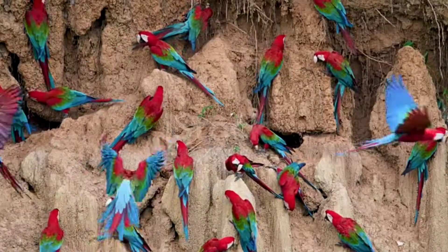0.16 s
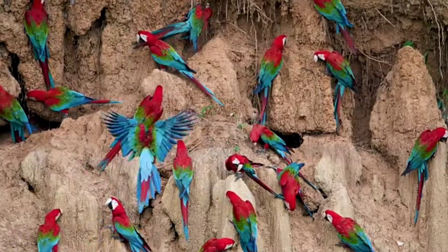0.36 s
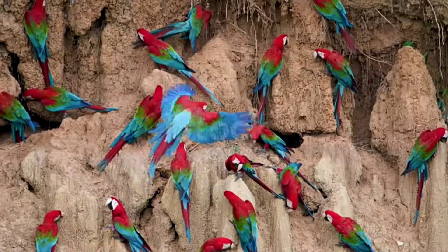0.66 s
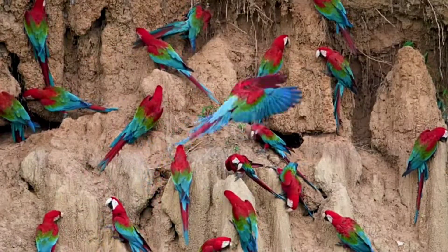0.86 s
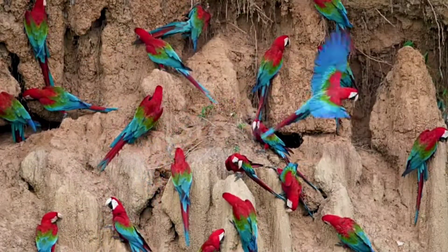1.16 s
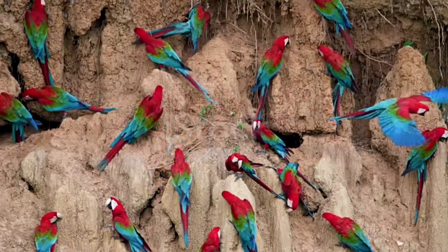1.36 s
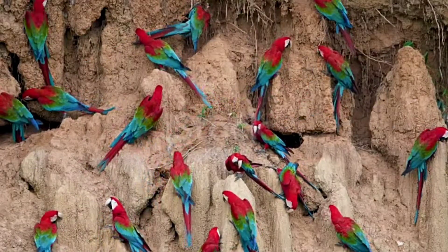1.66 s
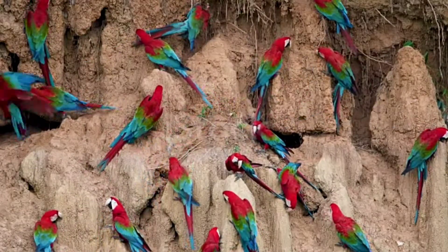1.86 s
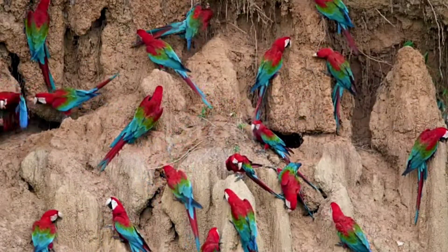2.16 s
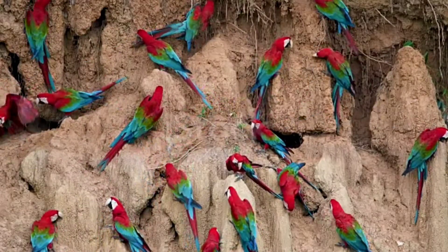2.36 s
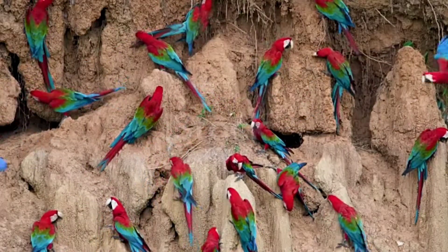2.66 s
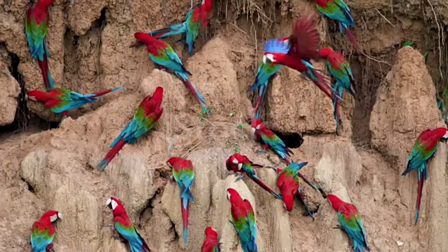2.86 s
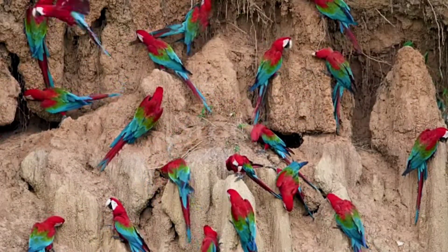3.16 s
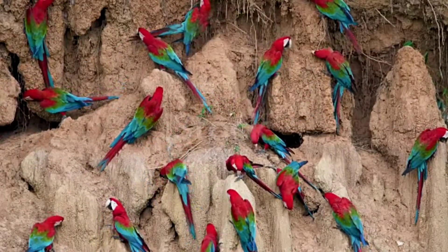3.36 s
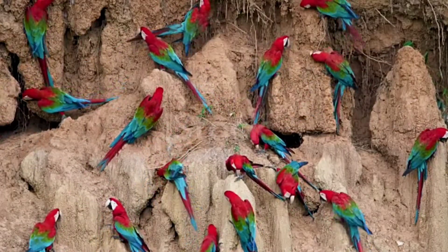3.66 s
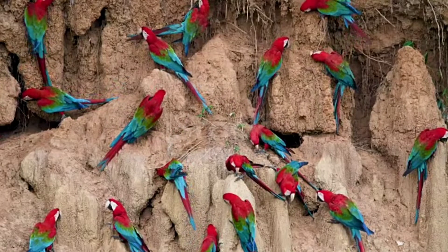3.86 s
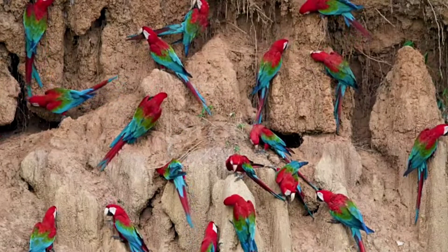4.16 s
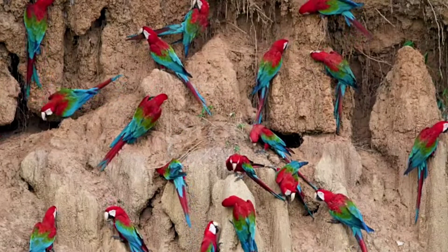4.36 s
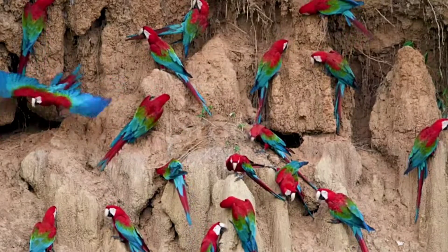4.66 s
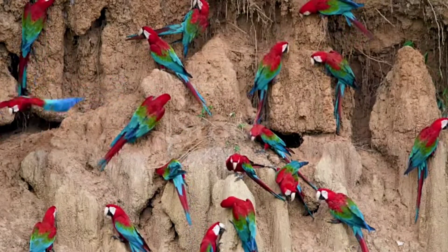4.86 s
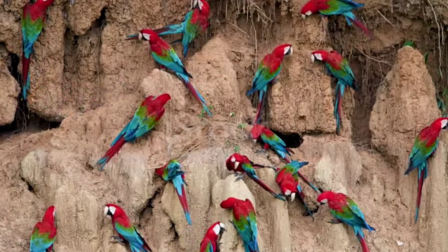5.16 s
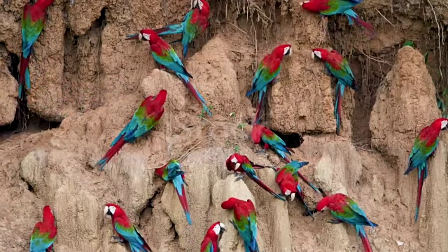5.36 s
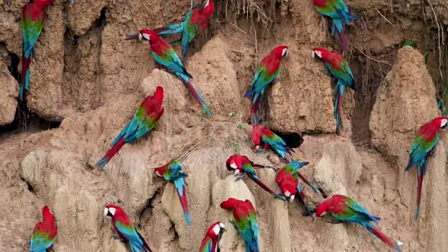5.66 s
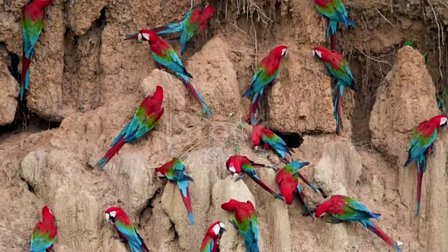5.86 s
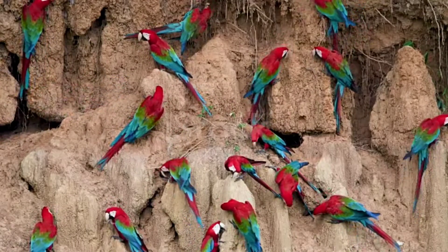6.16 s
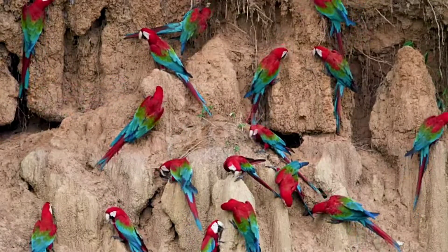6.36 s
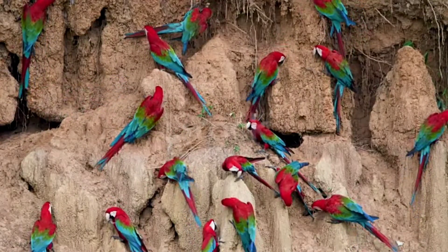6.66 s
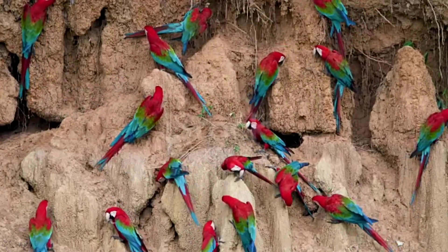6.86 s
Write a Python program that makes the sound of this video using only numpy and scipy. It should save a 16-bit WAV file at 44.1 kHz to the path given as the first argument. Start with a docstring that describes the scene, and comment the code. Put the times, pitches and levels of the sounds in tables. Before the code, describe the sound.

Macaws crowd a clay bank, calling almost without pause. Piercing squeals burst out first, then short raspy screams follow one another, joined by quick upward whoops. The middle turns to chattering runs of cracked squeals, and screeches and squeals mix at the end. Fainter birds screech behind. The microphone hears them from a moderate distance, with short clay reflections, a woodland echo and a faint steady hush.

```python
"""Clay bank by a forest: a flock of macaws squabbles in harsh screeches, cracked squeals, rising whoops and caws.
Each call is a sum of syrinx harmonics, roughened by pitch jitter, flutter and smear, coloured by throat and beak.
Each bird gets a small stereo offset and one echo off the clay; scattered forest echoes add a noise-built tail.
A faint outdoor hush of shaped stereo noise lies under everything; the extreme treble is cut steeply."""
import sys
import numpy as np
from scipy import signal
from scipy.fft import rfft, irfft, next_fast_len
from scipy.io import wavfile

SR = 44100
rng = np.random.default_rng(int(sys.argv[2]) if len(sys.argv) > 2 else 0)


def output_pcm(signal):
    """Save a mono or channel-first signal as 16-bit PCM at the path in sys.argv[1].

    Samples are clipped to [-1, 1] before scaling.
    """
    pcm = np.clip(np.atleast_2d(signal).T, -1, 1) * 32767
    wavfile.write(sys.argv[1], SR, np.round(pcm).astype(np.int16))


N = 309141

# Pitch, level and beak columns hold at full effort or at the crest; levels precede each voice's trim.
# Low, even calls: start_s, length_s, mid_pitch_hz, level_db
CAW_CALLS = [ (0.0, 0.092, 760, -50.5), (0.253, 0.18, 740, -53), (0.604, 0.12, 749, -50),
             (0.862, 0.21, 734, -50.5), (5.842, .22, 671, -57.5), (6.305, 0.34, 650.4, -57.5), ]
# Arched notes, single or in quick runs:
# start_s, rise_s, fall_s, open_hz, crest_hz, close_hz, level_db, roughness (0-1), brightness_db
SQUEAL_NOTES = [ (0.044, .012, 0.034, 2710, 2550, 2450, -38.5, 0.45, 5.5),
                (0.118, 0.02, 0.02, 3010, 3555, 2990, -29.5, 0.58, 13.5),
                (0.147, 0.03, 0.025, 2900, 2910, 2800, -30, 0.13, 10.5),
                (0.2, 0.024, 0.036, 2850, 3070, 2766, -28, 0, 3.5),
                (0.249, 0.017, 0.031, 2800, 2872, 2810, -35, 0.27, 9),
                (2.571, 0.043, 0.043, 2700, 2663, 2330, -43, 0.46, 19.5),
                (2.86, 0.083, 0.032, 2250, 2563, 2610, -43, 0.76, 13.5),
                (2.953, .03, 0.039, 3800, 3820, 3120, -31, 0.47, 7.5),
                (3.014, 0.061, 0.049, 3000, 3610, 3810, -35, 0.48, 3.5),
                (3.02, 0.03, 0.046, 2100, 2266, 2193, -44, 0.22, 19.5),
                (3.085, 0.015, 0.028, 2250, 2600, 2140, -40.5, 0.33, -3),
                (3.491, 0.023, 0.019, 2450, 2680, 2100, -42.5, 0.36, -3),
                (3.517, 0.053, 0.028, 2200, 2503, 2330, -35.5, 0.26, -1.5),
                (3.578, 0.021, 0.024, 2450, 2753, 2580, -35.5, 0.51, -2),
                (3.61, 0.018, .055, 2400, 2372, 2356, -31, 0.02, -5.5),
                (3.62, .04, 0.077, 2300, 2300, 1995, -46, 0.42, 10),
                (3.821, 0.048, 0.077, 2150, 2253, 2000, -42, 0.39, 5.5),
                (3.885, 0.022, 0.04, 1480, 1468, 1520, -50.5, 0.02, -12),
                (3.886, 0.083, 0.033, 2850, 3000, 3070, -42, 0.5, 6.5),
                (3.94, 0.016, 0.033, 2150, 2205, 2280, -37.5, 0.03, -1),
                (3.987, 0.026, .02, 2280, 2380, 2360, -34, .1, 3.5),
                (4.023, .022, 0.057, 2220, 2246, 2320, -36.5, 0.01, 3),
                (4.028, 0.025, .02, 2800, 3650, 2930, -33.5, 0.08, 1),
                (4.059, 0.016, .035, 3050, 2996, 3390, -40, 0.3, 15),
                (4.14, 0.021, 0.029, 1950, 2100, 2170, -52.5, 0.18, -1),
                (4.201, 0.091, 0.029, 2296, 2387, 2260, -56, 0.26, 10),
                (4.28, .055, 0.087, 2200, 2212, 1980, -40.5, 0.27, -18),
                (4.334, 0.074, 0.013, 2340, 3264, 3520, -43.5, 0.3, 9.5),
                (4.405, 0.061, 0.031, 2180, 2378, 2180, -37.5, 0.05, -20),
                (4.498, 0.048, 0.017, 2100, 2231, 2400, -37, 0.07, -21),
                (4.575, 0.16, 0.069, 2320, 2280, 2060, -47, 0.33, 12),
                (4.78, 0.03, 0.048, 2400, 2383, 2300, -42, 0.48, 14),
                (4.845, 0.011, 0.046, 2440, 2464, 2470, -46.5, .02, 19),
                (4.872, 0.024, .03, 3050, 3122, 3000, -30, 0.06, 3.5),
                (4.911, 0.013, 0.073, 2980, 2870, 2780, -38, 0.06, -4),
                (5.095, 0.016, .018, 3200, 3070, 3460, -31.5, 0.46, -4.5),
                (5.112, 0.027, 0.032, 3500, 2747, 2980, -34, 0.23, 5.5),
                (5.155, 0.028, 0.013, 3350, 3670, 3450, -29.5, 0.28, -3.5),
                (5.171, 0.12, 0.046, 2030, 2100, 1950, -53, 0.49, 11),
                (5.189, .06, 0.067, 2920, 3143, 2830, -33.5, 0.11, -1),
                (5.315, 0.039, 0.07, 2550, 2747, 2330, -41.5, 0.43, 7),
                (5.413, 0.029, 0.048, 2600, 2628, 2615, -43.5, 0.08, 8.5),
                (5.435, 0.012, .045, 1200, 1140, 1006, -57, 0, -14),
                (5.482, 0.02, 0.089, 2060, 2090, 2240, -54, 0.04, -0.5),
                (5.575, 0.065, 0.038, 2300, 2227, 2200, -46, .38, 8.5),
                (5.649, 0.082, .04, 2300, 2675, 2480, -36.5, 0.37, 7),
                (5.742, .018, 0.049, 2430, 2368, 2460, -43, 0.1, 5),
                (5.95, 0.14, 0.015, 2720, 2924, 2960, -39, 0.11, 10),
                (6.18, 0.027, 0.042, 2150, 2238, 2120, -47, 0.42, 9.5),
                (6.227, 0.039, 0.059, 2150, 2455, 2285, -41, 0.51, 8),
                (6.314, .029, 0.036, 2600, 2820, 2420, -36, 0.31, 6),
                (6.367, 0.022, 0.039, 2800, 2834, 2806, -46.5, 0, 24),
                (6.585, 0.055, 0.023, 2420, 2295, 2260, -41.5, 0.35, -17),
                (6.645, 0.018, .045, 2400, 2596, 2340, -39.5, .35, -5),
                (6.701, 0.036, 0.026, 2250, 1900, 1940, -44.5, 0.71, 14),
                (6.792, 0.016, 0.028, 3150, 3120, 2930, -37.5, 0.42, 8),
                (6.739, 0.052, .04, 3700, 3920, 3780, -45, 0.27, 0),
                (6.838, 0.039, 0.054, 2950, 3144, 2990, -38.5, 0.27, 15),
                (6.929, 0.065, 0.031, 2950, 2970, 2900, -42.5, 0.44, 13.5), ]
# Climbing notes: start_s, rise_s, open_hz, top_hz, level_db, swell_over_rise_db, roughness (0-1)
WHOOP_CALLS = [ (0.07, 0.023, 1370, 1395, -39.5, 2, 0.03), (1.99, 0.11, 1117, 1546, -43.5, 17.5, .15),
               (2.22, 0.12, 1220, 1512, -36.5, 16.5, .06), (2.462, .135, 1090, 1406, -38, 13.5, 0.06),
               (2.715, 0.13, 1012, 1376, -37.5, 17, 0.01), ]
# Harsh screams: start_s, attack_s, hold_s, release_s, pitch_hz, level_db, beak_hz, brightness_db
SCREECH_CALLS = [ (0.288, 0.029, 0.18, 0.064, 1020, -36, 3760, 0.5),
                 (0.509, 0.059, 0.049, .04, 959, -33.5, 3180, -1),
                 (0.631, 0.034, 0.042, 0.032, 1056, -34.5, 3950, 5.5),
                 (0.73, .02, .09, 0.042, 762, -57.5, 2640, 6),
                 (0.878, 0.065, 0.09, 0.037, 761.5, -41, 2780, -3),
                 (1.037, 0.048, 0.047, 0.04, 928, -36.5, 3380, 0),
                 (1.173, 0.044, 0.05, 0.0322, 987, -34, 4020, 0.5),
                 (1.282, 0.024, 0.089, 0.034, 776, -47, 2600, -1.5),
                 (1.39, 0.037, 0.041, .03, 996, -32, 4020, 3),
                 (1.508, 0.072, 0.058, 0.047, 884, -38, 3010, -2.5),
                 (1.672, 0.05, 0.051, 0.036, 1002, -35, 3960, 3),
                 (1.927, 0.024, 0.035, 0.078, 792, -53.5, 2300, -19),
                 (2.181, .06, 0.04, 0.039, 901.5, -35, 3400, -6.5),
                 (2.35, .03, .1, .22, 736, -45.5, 2360, -1.5),
                 (3.253, .035, .095, 0.022, 819, -40, 3380, -9),
                 (3.375, 0.012, 0.048, 0.044, 780, -50, 2450, 3),
                 (3.735, 0.035, 0.028, 0.064, 825, -38, 3160, -6),
                 (3.834, 0.022, 0.023, 0.05, 1032, -43, 4250, 1),
                 (4.631, .03, 0.24, 0.0363, 835, -51, 2760, 4),
                 (5.871, 0.054, .03, 0.034, 804, -41.5, 2760, 3),
                 (5.952, 0.033, 0.037, 0.095, 1024, -43, 3940, 4),
                 (6.216, 0.052, 0.041, 0.079, 889, -43, 3420, 2),
                 (6.467, 0.026, .13, 0.035, 871, -47, 2990, 7.5),
                 (6.631, 0.034, 0.029, 0.054, 983, -37, 3100, 2.5),
                 (6.722, 0.036, 0.078, 0.16, 977.5, -43.5, 3750, 5.5),
                 (6.962, 0.03, .022, 0.019, 1062, -35.5, 3830, 1), ]
# Outdoor hush spectrum: frequency_hz, relative_density_db
HUSH_SPECTRUM = [(25, -11.5), (65, 1), (110, -4), (190, 2.5), (300, -2), (500, 2), (1600, -2.5),
                 (2500, -6.5), (10000, -15)]
# Caw throat response: frequency_hz, gain_db
CAW_THROAT_RESPONSE = [(700, -13), (1500, -2), (2800, 2), (4000, -9), (9000, -20.5)]
# Squeal throat response: frequency_hz, gain_db
SQUEAL_THROAT_RESPONSE = [(1200, -0.5), (2200, 1), (3500, -3), (5200, -11), (7000, -19.5), (8500, -19),
                          (10300, -18.5)]
# Whoop throat response: frequency_hz, gain_db
WHOOP_THROAT_RESPONSE = [(1000, 1.5), (1400, -6), (2700, 3.5), (4100, -11), (6500, -14.5), (10000, -27.5)]
# Screech throat response: frequency_hz, gain_db
SCREECH_THROAT_RESPONSE = [(800, -15.5), (1400, -11), (2200, -5.5), (4200, -3), (5400, -6.5), (6700, -12.5),
                           (8400, -10), (10500, -10)]

CAW_CLIMB_HZ_PER_S, CAW_ENDS_DB = 340, -3
SQUEAL_OPEN_DB, SQUEAL_CLOSE_DB = -4.5, -5.5  # note ends relative to crest
CRACK_ROUGHNESS, CRACK_DECAY_S = 0.063, 0.019  # extra roughness at a squeal's onset
WHOOP_FALL_S, WHOOP_DROP_HZ, WHOOP_DROP_DB = .036, 161, -12
SLACK_DB, SLACK_PITCH_SHARE, SLACK_BEAK_SHARE = -11.5, .11, 0.18  # screech losses at zero effort
FAR_HZ, FAR_BEAK_HZ, FAR_DB, FAR_BRIGHT_DB = 847.5, 2096, -61, -0.5  # lowest of the unseen birds
TOP_HZ = 10850
SIDES = np.array([[1], [-1]])  # the two channels


def db_to_gain(db):
    """Amplitude ratio of a level in dB."""
    return 10 ** (np.asarray(db) / 20)


def response(points, hz):
    """Gain of a (frequency_hz, gain_db) outline, interpolated over log frequency."""
    point_hz, point_db = np.transpose(points)
    return db_to_gain(np.interp(np.log(hz + 1), np.log(point_hz), point_db))


def wander(n, corner_hz):
    """Smooth random signal of spread 1; its spectrum falls away above corner_hz."""
    f = np.fft.rfftfreq(next_fast_len(2 * n, True), 1 / SR)
    lowpass = 1 / (1 + (f / corner_hz) ** 3)
    y = irfft(lowpass * (rng.standard_normal(len(f)) + 1j * rng.standard_normal(len(f))))
    return y[:n] / y.std()


def clock(length_s):
    """Seconds since a call began."""
    return np.arange(int(length_s * SR)) / SR


def diffuse(n, outline, apart_hz):
    """Noise from all around: unrelated between channels in the deep bass and the treble, partly alike in
    between."""
    f = np.fft.rfftfreq(n, 1 / SR)
    mid, side = rfft(rng.standard_normal((2, n))) * response(outline, f)
    width = np.clip(f / apart_hz + 1 / (1 + f / 260), 0, 1)
    return irfft(mid + width * side * SIDES, n)


def outdoor_hush(level_db=-60.5):
    """Steady shaped noise at a set RMS level."""
    hush = diffuse(N, HUSH_SPECTRUM, apart_hz=5700)
    return hush * db_to_gain(level_db) / hush.std()


def syrinx(pitch_hz, rough, gains, jitter, jitter_hz, flutter, flutter_hz, chaos, chaos_hz, lock=lambda k: 0):
    """Harmonics on a shaking pitch; roughness flaps the membranes and smears unlocked lines into bands."""
    n = len(pitch_hz)
    flap_hz = flutter_hz * (1 + 0.283 * wander(n, 67.3))
    flap = np.sin(2 * np.pi * np.cumsum(flap_hz) / SR)
    shaken_hz = pitch_hz * (1 + jitter * rough * wander(n, jitter_hz))
    phase = 2 * np.pi * np.cumsum(shaken_hz) / SR
    tone = 0
    for k, gain in gains:
        smear = chaos * rough * np.sqrt(k) * (1 - lock(k))
        shake = (wander(n, chaos_hz) + 1j * wander(n, chaos_hz)) / np.sqrt(2)
        line = np.imag((1 + smear * shake) * np.exp(1j * k * phase))
        tone = tone + gain * line / np.sqrt(1 + smear ** 2)  # smear leaves mean power unchanged
    return np.sqrt(2) * tone * (1 + flutter * rough * flap)


def partials(pitch_hz, throat, bright_db, multiples):
    """(multiple, gain) through the throat; bright_db phases in from 3900 to 4800 Hz."""
    gains = []
    for k in multiples:
        hz = k * pitch_hz
        brightness = db_to_gain(bright_db * np.clip((hz - 3900) / 900, 0, 1))
        gains.append((k, response(throat, hz) * (hz < SR / 3) * brightness))
    return gains


def caw(pitch_hz, level_db):
    """Slightly rough syrinx tone of a low call from further along the bank."""
    gains = partials(pitch_hz, CAW_THROAT_RESPONSE, 0, np.arange(1, SR / 4 // pitch_hz.min()))
    tone = syrinx(pitch_hz, 0.12, gains, jitter=0.077, jitter_hz=201, flutter=0, flutter_hz=200,
                  chaos=2.8, chaos_hz=126)
    return tone * db_to_gain(level_db + 2.5)


def play_caw(length_s, mid_hz, level_db):
    """Pitch creeps upward; the middle is loudest."""
    from_mid_s = clock(length_s) - length_s / 2
    pitch_hz = mid_hz + CAW_CLIMB_HZ_PER_S * from_mid_s
    return caw(pitch_hz, level_db + CAW_ENDS_DB * (2 * from_mid_s / length_s) ** 2)


def squeal(pitch_hz, level_db, rough, bright_db):
    """High cracked tone; period doubling adds weak lines halfway between harmonics."""
    whole = np.arange(1, SR / 3 // pitch_hz.min())
    gains = partials(pitch_hz, SQUEAL_THROAT_RESPONSE, bright_db, whole)
    halfway = partials(pitch_hz, SQUEAL_THROAT_RESPONSE, bright_db, whole - .5)
    gains += [(k, gain * rough * db_to_gain(-20.5)) for k, gain in halfway]
    waver = 1 + .08 * rough * wander(len(pitch_hz), 55)
    tone = syrinx(pitch_hz * waver, rough, gains, jitter=.075, jitter_hz=340, flutter=.55, flutter_hz=280,
                  chaos=1.1, chaos_hz=250)
    return tone * db_to_gain(level_db - 0.76)


def play_squeal(rise_s, fall_s, open_hz, crest_hz, close_hz, level_db, rough, bright_db):
    """Pitch and level follow one parabola into the crest and another out; the onset cracks."""
    t = clock(rise_s + fall_s)
    rising = t < rise_s
    away = np.interp(t, [0, rise_s, rise_s + fall_s], [1, 0, 1]) ** 2  # 0 at the crest
    pitch_hz = crest_hz + away * (np.where(rising, open_hz, close_hz) - crest_hz)
    bent_db = level_db + away * np.where(rising, SQUEAL_OPEN_DB, SQUEAL_CLOSE_DB)
    cracked = np.clip(rough + CRACK_ROUGHNESS * np.exp(-t / CRACK_DECAY_S), 0, 1)
    return squeal(pitch_hz, bent_db, cracked, bright_db)


def whoop(pitch_hz, level_db, rough):
    """Clear syrinx tone; the throat favours the second harmonic."""
    gains = partials(pitch_hz, WHOOP_THROAT_RESPONSE, 0, np.arange(1, SR / 4 // pitch_hz.min()))
    tone = syrinx(pitch_hz, rough, gains, jitter=0.118, jitter_hz=300, flutter=0.24, flutter_hz=280,
                  chaos=0.94, chaos_hz=199)
    return tone * db_to_gain(level_db + 2.5)


def play_whoop(rise_s, open_hz, top_hz, level_db, swell_db, rough):
    """The note swells while its climb levels off, then drops quickly in pitch and level."""
    t = clock(rise_s + WHOOP_FALL_S)
    to_go = np.maximum(1 - t / rise_s, 0)
    drop = (np.maximum(t - rise_s, 0) / WHOOP_FALL_S) ** 2
    pitch_hz = top_hz + (open_hz - top_hz) * to_go ** 2 - WHOOP_DROP_HZ * drop
    return whoop(pitch_hz, level_db - swell_db * to_go + WHOOP_DROP_DB * drop, rough)


def screech(pitch_hz, level_db, beak_hz, bright_db):
    """Harsh scream; the wider the beak opens, the higher it resonates and the tighter the voice."""
    n = len(level_db)
    rough = np.clip(.88 - (beak_hz - 2700) / 4200, .1, 1)
    pitch_hz = pitch_hz * (1 + .04 * rough * wander(n, 50))

    def resonance(k):
        """A harmonic near the beak resonance swells and locks into a clearer band."""
        return 1 / (1 + ((k * pitch_hz - beak_hz) / 400) ** 2)

    def horn(k):
        """The open beak holds back harmonics well below its resonance."""
        return np.clip((k * pitch_hz / (.68 * beak_hz)) ** 2, .7, 1)

    gains = []
    multiples = np.arange(1, SR / 3 // pitch_hz.max())
    for k, gain in partials(pitch_hz, SCREECH_THROAT_RESPONSE, bright_db, multiples):
        # shifting tongue and throat: each harmonic swells and fades on its own
        shifting = db_to_gain(2.62 * wander(n, 18) - 0.48)
        gains.append((k, gain * horn(k) * (1 + resonance(k)) * shifting))
    tone = syrinx(pitch_hz, rough, gains, jitter=.05, jitter_hz=220, flutter=.4, flutter_hz=210,
                  chaos=.9, chaos_hz=340, lock=resonance)
    return tone * db_to_gain(level_db - 3.0 + rough * wander(n, 34))


def play_screech(attack_s, hold_s, release_s, full_hz, level_db, beak_hz, bright_db):
    """Effort builds, holds and lets go; pitch, level and beak opening follow it."""
    corners_s = np.cumsum([0, attack_s, hold_s, release_s])
    slack = np.interp(clock(corners_s[-1]), corners_s, [1, 0, 0, 1])
    return screech(full_hz * (1 - SLACK_PITCH_SHARE * slack), level_db + SLACK_DB * slack,
                   beak_hz * (1 - SLACK_BEAK_SHARE * slack), bright_db)


def far_flock(count=44):
    """Faint screeches of birds out of sight at random moments; rows as in SCREECH_CALLS."""
    calls = []
    for when, length, size, force in rng.random((count, 4)):
        start_s = when * (N / SR - .1)
        half_s = 0.042 + .1 * length
        higher = 1 + 0.48 * size
        calls.append((start_s, half_s, 0, half_s, FAR_HZ * higher, FAR_DB + 4 * force,
                      FAR_BEAK_HZ * higher, FAR_BRIGHT_DB))
    return calls


def place_bird(out, start, voice, lag_s=2.0e-5, pan_db=0.7, echo_db=-9, echo_s=0.01):
    """Random lag and balance between channels, plus one echo off the clay with the lag reversed."""
    n = len(voice)
    from_edge = np.minimum(np.arange(n), np.arange(n)[::-1])
    fade = np.clip(from_edge / (.009 * SR), 0, 1)
    size = 2 * next_fast_len(n // 2 + SR // 20)
    f = np.fft.rfftfreq(size, 1 / SR)
    lag = lag_s * rng.uniform(.5, 2)
    echo = db_to_gain(echo_db) * np.exp(-2j * np.pi * f * echo_s * rng.uniform(.5, 1.8))
    balance = db_to_gain(pan_db * rng.uniform(-0.3, 1) * SIDES / 2)
    direct = np.exp(1j * np.pi * f * lag * SIDES) * balance
    placed = irfft(rfft(voice * fade, size) * (direct + echo * direct.conj()))
    placed = placed[:, :max(N - start, 0)]
    out[:, start:start + placed.shape[1]] += placed


def forest_echoes(dry, t60_s=.8, wet_db=-12):
    """Scattered echoes from bank and trees: convolution with decaying diffuse noise."""
    t = np.arange(SR) / SR
    outline = [(800, -8.0), (3000, -3.5), (10000, -1.5)]  # frequency_hz, gain_db
    envelope = db_to_gain(-60 * t / t60_s) * (1 - np.exp(-t / 0.0033))
    tail = diffuse(SR, outline, apart_hz=7500) * envelope
    tail /= np.sqrt(np.sum(tail ** 2) / 2)  # unit mean energy per channel
    mono = dry.mean(axis=0)[None]
    return db_to_gain(wet_db) * signal.fftconvolve(mono, tail, axes=1)[:, :N]


def scene():
    """All calls along the bank, with forest echoes and hush."""
    birds = np.zeros((2, N))
    voices = [(play_caw, CAW_CALLS), (play_squeal, SQUEAL_NOTES), (play_whoop, WHOOP_CALLS),
              (play_screech, list(SCREECH_CALLS) + far_flock())]
    for play, calls in voices:
        for start_s, *call in calls:
            place_bird(birds, max(int(start_s * SR), 0), play(*call))
    # the calls carry little bass
    bird_highpass = signal.butter(2, 520, "high", fs=SR, output="sos")
    birds = signal.sosfilt(bird_highpass, birds)
    return birds + forest_echoes(birds) + outdoor_hush()


def record(dry):
    """Steep elliptic low-pass at TOP_HZ."""
    return signal.sosfilt(signal.ellip(12, .2, 80, TOP_HZ, fs=SR, output="sos"), dry)


dry = scene()
out = record(dry)
output_pcm(out)
```